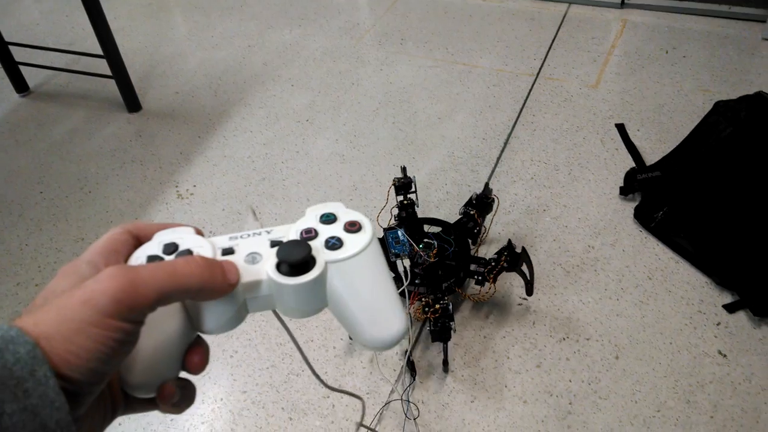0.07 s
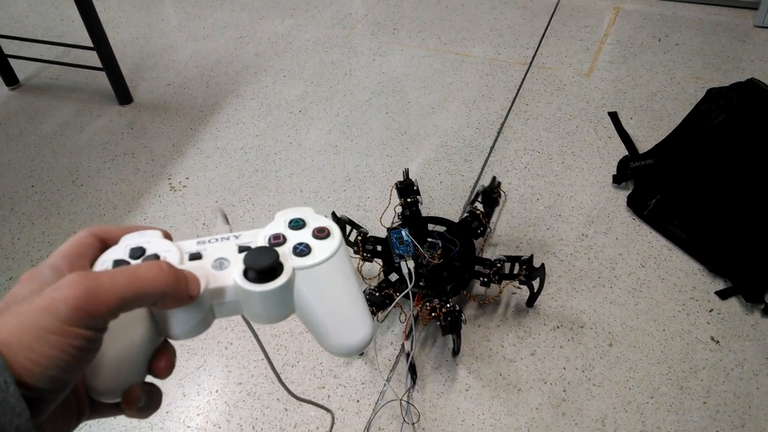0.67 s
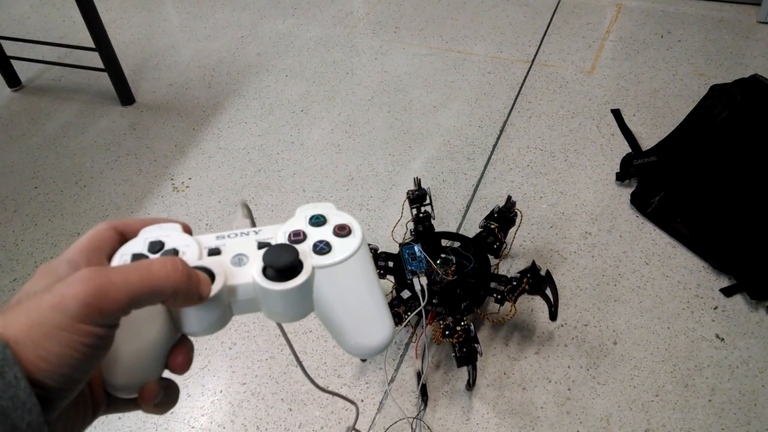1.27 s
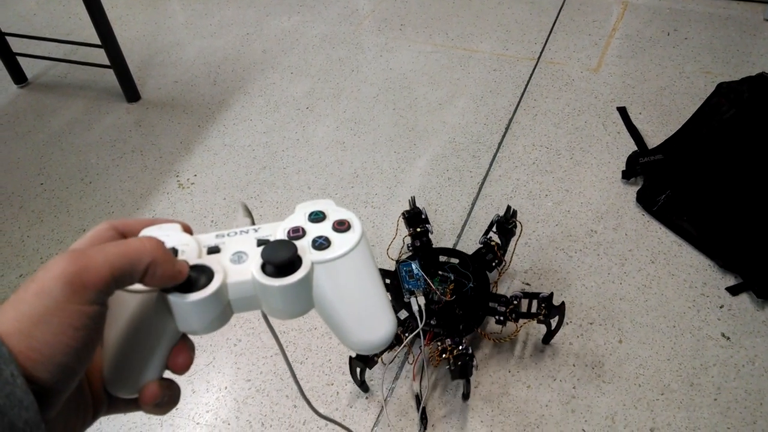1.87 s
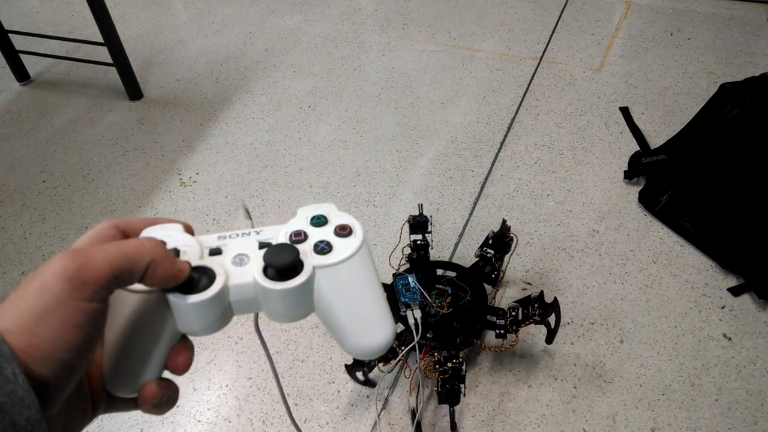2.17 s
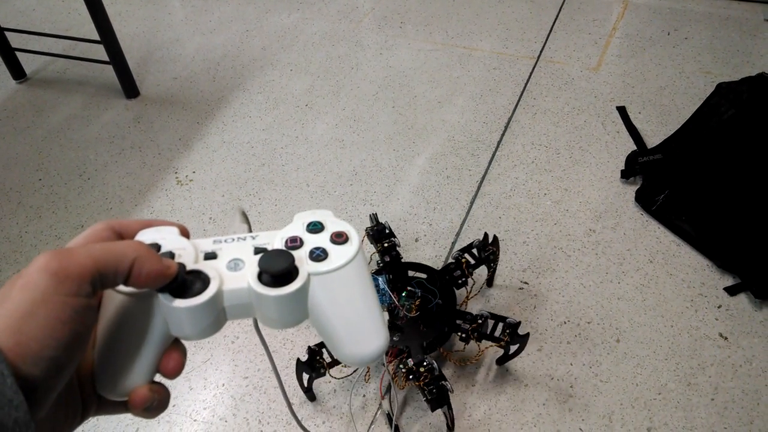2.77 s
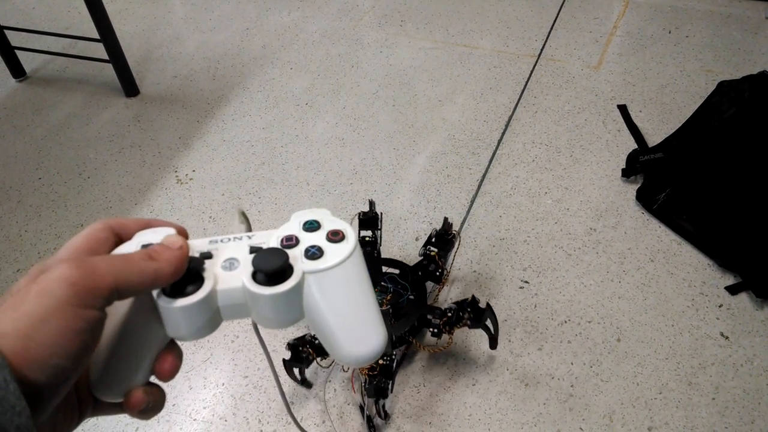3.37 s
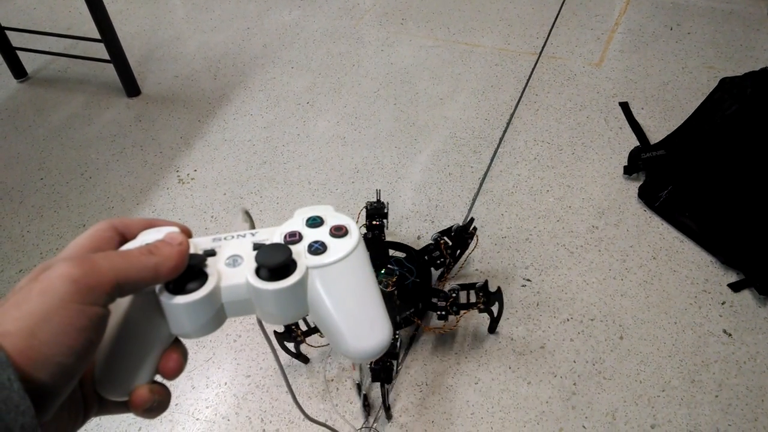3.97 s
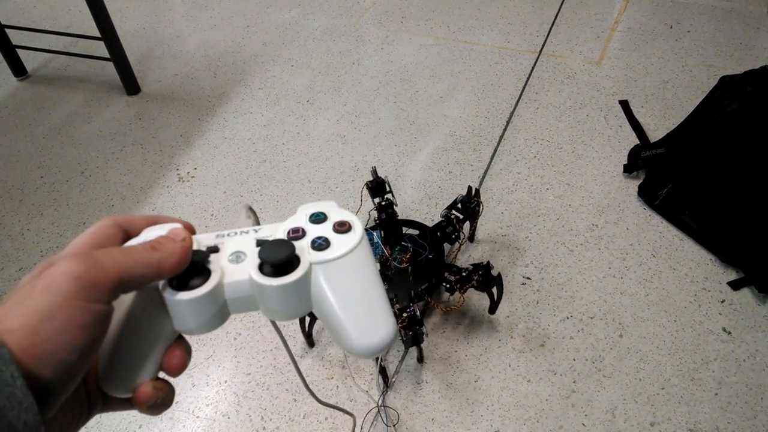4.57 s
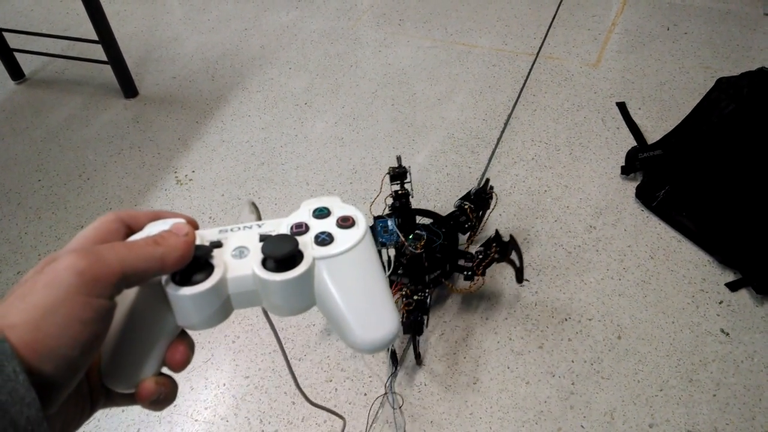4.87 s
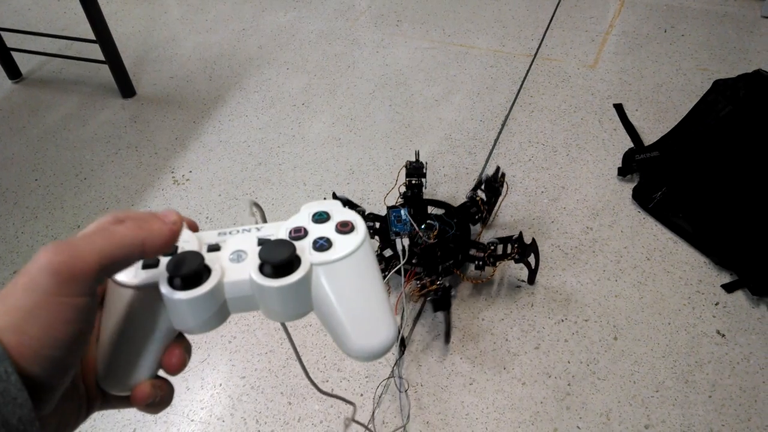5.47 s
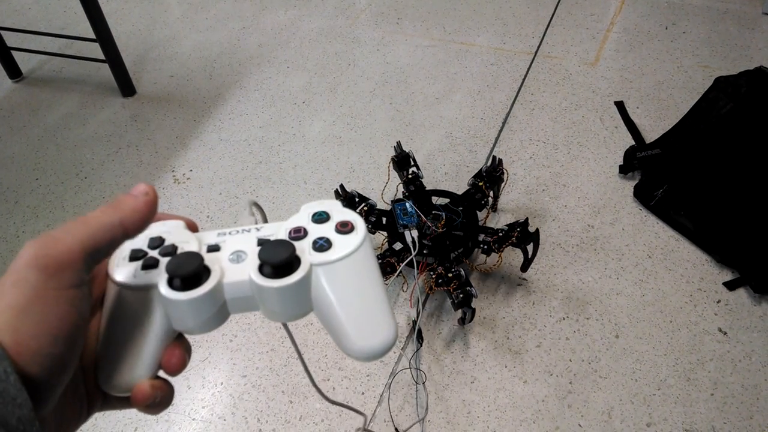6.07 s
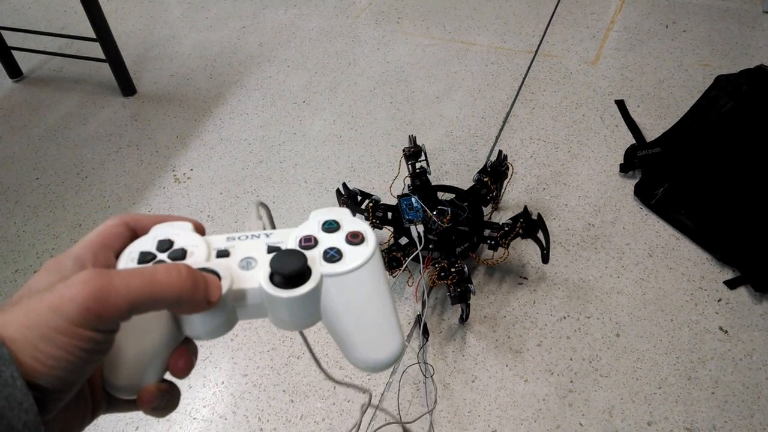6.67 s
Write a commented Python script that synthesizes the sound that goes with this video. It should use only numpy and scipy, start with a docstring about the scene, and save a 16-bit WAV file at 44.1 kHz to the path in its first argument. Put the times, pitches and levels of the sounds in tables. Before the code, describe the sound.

Ventilation hums steadily in a large room while a small walking robot moves in front of the microphone, slightly to the right. Its servos buzz and whine in repeating surges, and five sharp footfalls clack on the hard floor, each shaking and rattling its body, with lighter steps in between. The steps then stop, leaving faint high motor tones and a single close plastic click from a game controller.

```python
"""Geared servos whirr and whine as a small six-legged robot walks a hard floor, one stride every 1.2 s.
Its legs fizz as they swing free; feet snap down and the frame thuds and rattles. Stalled motors sing
as they hold a load, and in a pause a gamepad clicks once, close by. The robot is in front and to the
right of a closely spaced microphone pair, in a large room where ventilation hums throughout."""
import sys
import numpy as np
from scipy import signal
from scipy.fft import rfft, irfft
from scipy.io import wavfile
from scipy.ndimage import uniform_filter1d, map_coordinates

SR = 44100
rng = np.random.default_rng(int(sys.argv[2]) if len(sys.argv) > 2 else 0)


def master_out(mix):
    """Clip the mix to full scale and print it as 16-bit PCM to the path in sys.argv[1]."""
    frames = np.transpose(np.atleast_2d(mix))
    ceiling = np.clip(frames, -1, 1)
    pcm = np.round(ceiling * 32767).astype(np.int16)
    wavfile.write(sys.argv[1], SR, pcm)


N = 295911
TIME = np.arange(N) / SR


# Servo cases ringing under load, in front of the microphones: pitch_hz, width_hz, level_db
LOADED_CASE_MODES = [(1784, 160, -2.5), (3324, 1200, 0), (4360, 340, 3.5), (4800, 230, 2.5),
                     (6210, 480, -3), (8770, 500, -4.5), (11600, 4600, -18), (14900, 2900, -12.5)]
# The same cases with the gears running free: pitch_hz, width_hz, level_db
FREE_CASE_MODES = [(2000, 410, -2), (3470, 2300, 0.5), (6070, 1300, 3.5), (9030, 410, 8), (10400, 2200, -4),
                   (12250, 750, 1), (15200, 900, -8)]

def servos(load, pushing):
    """Gears whirr under load and fizz when they run free; backlash ticks through both."""
    whirr = gear_train(LOADED_CASE_MODES, mesh_hz=559, chatter_db=5.5, buzz_db=2, flutter_db=1.3)
    fizz = gear_train(FREE_CASE_MODES, mesh_hz=951, chatter_db=10, buzz_db=2.5, flutter_db=2)
    whirr = whirr + from_db(-9) * backlash()
    fizz = fizz + from_db(-10.5) * backlash()
    return load * whirr + from_db(4) * swinging_legs(fizz, pushing)


def gear_train(case, mesh_hz, chatter_db, buzz_db, flutter_db, servo_count=3):
    """Teeth strike the case in a buzz that glides with each servo's speed; their play chatters."""
    buzz, chatter = 0, 0
    for _ in range(servo_count):
        speed = from_db(1.3 * drift(2.5))
        teeth = np.cumsum(mesh_hz * speed * (1 + .006 * drift(150))) / SR
        buzz = buzz + np.diff(teeth % 1, prepend=0) * from_db(3 * drift(6))
        pulsing = from_db(chatter_db * np.sin(np.pi * teeth / 2))  # one cycle every four teeth
        chatter = chatter + grains(per_s=4700, spread_db=0.5) * pulsing
    sound = rms_one(resonate(chatter, case)) + from_db(buzz_db) * rms_one(resonate(buzz, case))
    return evened(sound, samples=SR // 16) * from_db(flutter_db * drift(47))


# Servo cases ticking as the teeth jump their play: pitch_hz, width_hz, level_db
BACKLASH_MODES = [(5540, 540, -0.5), (6850, 1400, -3), (8200, 610, 2), (11400, 1500, -10)]

def backlash():
    """Loose teeth tick at random, in small clusters."""
    ticks = grains(per_s=170, spread_db=-1.5) * from_db(2 * drift(24))
    return evened(resonate(ticks, BACKLASH_MODES), samples=SR // 4)


# Legs swung through the air between footfalls and set down softly, one after another:
# first_foot_s, swing_s, last_foot_delay_s, fizz_db, speed_ratio, tap_db, thud_db
SWINGS = [(0.523, 0.34, 0.0037, -39.5, 1.03, -20, -24), (1.69, 0.36, 0.024, -38.5, 1.02, -23.5, -27),
          (2.894, 0.35, 0.026, -39.5, 0.97, -22, -30), (4.079, 0.42, 0.042, -40.5, 1.0, -20, -31),
          (5.242, 0.28, 0.0077, -39.5, 1, -40, -29)]

def swinging_legs(fizz, pushing, peak_share=.76, brake_s=0.053, glide=.06):
    """A free leg gathers speed and brakes as the last foot lands; its fizz swells and climbs with it."""
    level = from_db(-12) * pushing  # a little fizz in each push too
    pitch = 1 - glide + .011 * drift(9)
    for foot_s, swing_s, delay_s, fizz_db, speed_ratio, *_ in SWINGS:
        progress = np.maximum(TIME - foot_s + swing_s, 0) / (swing_s + delay_s)
        braking = np.clip(1 - (TIME - foot_s - delay_s) / brake_s, 0, 1)
        speed = np.abs(np.sin(np.pi / 2 * np.minimum(progress / peak_share, 2))) * braking
        level = level + from_db(fizz_db) * speed ** 1.2
        pitch = pitch + (glide + speed_ratio - 1) * speed
    return level * map_coordinates(fizz, [np.cumsum(pitch)], order=3, mode="mirror")


# Joint moves that whine clearly at the microphones, each gliding in an arc:
# start_s, length_s, first_hz, middle_hz, last_hz, level_db
JOINT_MOVES = [(0.02, 0.19, 4220, 4070, 3920, -45), (0.17, 0.21, 3970, 3640, 3370, -45),
               (0.194, 0.13, 4200, 4280, 4130, -47), (0.66, 0.11, 3590, 3770, 3900, -42),
               (0.8, 0.12, 4250, 4240, 4190, -48), (0.831, 0.11, 4050, 3980, 3760, -43),
               (1.14, 0.17, 4270, 4330, 4080, -44.5), (1.461, 0.165, 3800, 3640, 3600, -39),
               (1.603, .1, 4670, 4600, 4420, -47), (1.742, 0.21, 4600, 4790, 4900, -40),
               (1.78, 0.26, 4090, 4250, 4100, -47), (2.03, 0.094, 3600, 3500, 3460, -47),
               (2.357, 0.13, 4330, 4350, 4400, -45), (2.726, 0.12, 4220, 3900, 3580, -36.5),
               (2.987, 0.16, 4600, 4840, 4760, -38.5), (3.079, 0.2, 4080, 3620, 3340, -44),
               (3.15, 0.11, 4310, 3980, 3680, -44), (3.21, 0.18, 4470, 4320, 4300, -46),
               (3.568, 0.12, 4780, 4580, 4520, -41), (4.189, 0.16, 4020, 3860, 3840, -41),
               (4.202, 0.12, 4770, 4900, 4630, -38), (4.327, 0.13, 3850, 4160, 4060, -37),
               (4.374, 0.12, 3900, 3800, 3660, -44), (4.736, 0.12, 3720, 3630, 3590, -44),
               (5.025, 0.094, 3740, 4050, 4230, -38), (5.446, 0.1, 4380, 4360, 4160, -49),
               (5.568, 0.076, 4280, 4170, 4120, -46), (6.566, 0.11, 3630, 3480, 3500, -47)]

def gear_whines(roughness, waver, flutter_db, octave_db):
    """The gear mesh glides with the joint's speed, wavers with its load and is roughened by backlash."""
    out = np.zeros(N)
    unsteady = roughness * drift(175) + waver * drift(17.6)
    flutter = from_db(flutter_db * drift(32))
    for start_s, length_s, first_hz, middle_hz, last_hz, level_db in JOINT_MOVES:
        progress = np.linspace(0, 1, int(length_s * SR))
        own = rng.integers(N - SR) + np.arange(len(progress))  # each joint wavers in its own way
        arc_hz = np.polyval(np.polyfit([0, .5, 1], [first_hz, middle_hz, last_hz], 2), progress)
        phase = 2 * np.pi * np.cumsum(arc_hz * (1 + unsteady[own])) / SR
        mesh = np.sin(phase) + from_db(octave_db) * np.sin(2 * phase)
        envelope = np.sqrt(np.abs(np.sin(np.pi * progress)))
        add(out, start_s, from_db(level_db) * envelope * flutter[own] * mesh)
    return out


# Planted legs pushing the body across the floor: start_s, end_s, rise_s, gear_db, shudder_db
PUSHES = [(-0.1, 0.06, .03, -39, -39), (0.61, 0.914, .03, -44, -44.5), (1.79, 1.95, 0.026, -40, -52),
          (2.95, 3.313, .03, -41.5, -66), (4.162, 4.373, .03, -43, -67), (4.73, 4.827, .03, -41, -49),
          (5.308, 5.56, .03, -52, -58), (6.59, 6.58, 0.23, -45.5, -64)]

def effort():
    """Strength of the gear load, the frame's shudder and the pushes alone; causes add in power."""
    walking = 1 - swell(6.0, 6.46, attack_s=0.06, release_s=0.06)  # zero during the pause
    gears, frame = [from_db(-43.5) * walking], [from_db(-52) * walking]  # small moves keep both astir
    for at_s, *_ in FOOTFALLS:  # the gears take up the weight
        gears.append(from_db(-35.5) * swell(at_s, at_s + 0.1, attack_s=.045, release_s=0.26))
    for steps, tremble_db in (FOOTFALLS, -34.5), (SWINGS, -43.5):
        for at_s, *_ in steps:
            tremble = (TIME > at_s) * np.exp(-np.abs(TIME - at_s) / 0.24)
            frame.append(from_db(tremble_db) * walking * tremble)
    pushing = 0
    for start_s, end_s, rise_s, gear_db, shudder_db in PUSHES:
        push = swell(start_s, end_s, rise_s, release_s=0.097)
        pushing = pushing + from_db(gear_db) * push
        frame.append(from_db(shudder_db) * push)
    return np.linalg.norm(gears + [pushing], axis=0), np.linalg.norm(frame, axis=0), pushing


# Feet on the hard floor, once a stride; the crack is relative to the ring: time_s, snap_db, ring_hz,
# crack_db, toe_db, rebound_delay_s, rebound_db, settle_delay_s, tap_db, thud_db, knock_db, rattle_db
FOOTFALLS = [(0.9675, -9, 3780, -5, -21, 0.012, -17, 0.059, -21, -19.5, -45, -21),
             (2.1705, -11, 4040, -3.5, -29, 0.0085, -10, 0.067, -23.5, -24, -50, -26),
             (3.3716, -9.5, 4080, -0.5, -20, 0.023, -30, 0.0655, -17, -19, -34, -25),
             (4.5698, -11.5, 3810, 1, -18, .032, -23, 0.049, -26, -38, -68, -26.5),
             (5.7227, -8.5, 3460, -0.5, -19, 0.016, -24, 0.053, -27, -20, -55, -23)]
# Joints clacking in their play, most often just after a footfall: time_s, level_db, crack_db
JOINT_CLACKS = [(.431, -41, 17), (.875, -32, 7), (1.0124, -21, 9), (1.037, -24, 7), (1.279, -32.5, 11),
                (1.664, -26, 9), (2.2176, -26, 10), (2.24, -25, 6), (2.933, -25.5, 8), (3.224, -32.5, 13),
                (3.3349, -29.5, 10), (3.4005, -27, 8), (3.418, -27, 15), (3.443, -28, 12), (3.469, -28, 12),
                (3.512, -26, 8), (4.067, -25, 3), (4.38, -25.5, -12), (4.546, -35.5, 15.5), (4.587, -27, 6),
                (4.635, -29, 10), (4.896, -21.5, 1.5), (5.779, -20.5, 1), (5.801, -33, 7), (5.862, -35, 0),
                (5.9264, -35, 8)]

def gait(leg_hz=3960, settle_crack_db=10, soft_crack_db=-1.5, light_knock_db=-63):
    """Feet touch, snap down, rebound and take the weight: contacts for the legs, blows for the frame."""
    contacts = [(at_s, level_db, leg_hz, crack_db) for at_s, level_db, crack_db in JOINT_CLACKS]
    blows = []  # time_s, thud_db, knock_db, rattle_db
    for (at_s, snap_db, ring_hz, crack_db, toe_db, rebound_s, rebound_db,
         settle_s, tap_db, thud_db, knock_db, rattle_db) in FOOTFALLS:
        contacts += [(at_s - .004, toe_db, ring_hz, crack_db),
                     (at_s, snap_db, ring_hz, crack_db),
                     (at_s + rebound_s, rebound_db, ring_hz, crack_db),
                     (at_s + settle_s, tap_db, ring_hz, settle_crack_db)]
        blows += [(at_s + 0.0188, -34, light_knock_db, -28.5),  # the frame feels the snap a little later
                  (at_s + settle_s - 0.0026, thud_db, knock_db, rattle_db)]  # it gives before the tap
    for at_s, _, delay_s, *_, tap_db, thud_db in SWINGS:
        contacts += [(at_s, tap_db - 5, leg_hz, soft_crack_db),  # the first foot touches more lightly
                     (at_s + delay_s, tap_db, leg_hz, soft_crack_db)]
        blows.append((at_s, thud_db, light_knock_db, -27))
    return contacts, blows


# Loose parts of a leg, buzzing and rattling just above the floor: pitch_hz, width_hz, level_db
LEG_MODES = [(2300, 800, 2.5), (3060, 2000, -1.5), (4730, 310, 4.5), (6480, 150, -4.5), (9000, 320, -4),
             (11000, 350, -4.5)]

def leg_taps(contacts, ring_s, crack_s, crack_band_hz, buzz_db, buzz_s):
    """A contact rings the leg for a few cycles, with a bright crack and a short buzz of loose parts."""
    out, t = np.zeros(N), TIME[:SR // 8]
    for at_s, level_db, ring_hz, crack_db in contacts:
        phase = 2 * np.pi * ring_hz * (1 + .02 * rng.standard_normal()) * t
        two_modes = np.sin(phase) - from_db(-15.5) * np.sin(1.33 * phase)
        ring = t / ring_s * np.exp(1 - t / ring_s) * two_modes
        crack = rms_one(band(rng.standard_normal(len(t)), *crack_band_hz, order=3))
        crack *= 0.44 * np.exp(-t / crack_s)
        buzz = rms_one(resonate(rng.standard_normal(len(t)), LEG_MODES[1:]))
        buzz *= np.exp(-t / buzz_s) * (1 - np.exp(-t / ring_s))
        add(out, at_s, from_db(level_db) * (ring + from_db(crack_db) * crack + from_db(buzz_db) * buzz))
    return out


# The walking frame's dull thud: pitch_hz, width_hz, level_db
FRAME_THUD_MODES = [(171, 78, -1.5), (259, 108, 2), (372, 47, 3.5), (486, 87, -15.5)]
# The knock of the deck it carries: pitch_hz, width_hz, level_db
DECK_MODES = [(596, 135, 2), (755, 190, -2.5), (990, 140, -6), (1740, 280, -24)]

def landings(blows, shudder, thud_s, knock_s, rattle_s):
    """The frame thuds and shudders, the deck knocks and the play in the joints rattles out."""
    powers, t = np.zeros((3, N)), TIME[:SR]
    attack = 1 - np.exp(-t / 0.0002)
    for at_s, *levels_db in blows:
        for power, level_db, decay_s in zip(powers, levels_db, (thud_s, knock_s, rattle_s)):
            add(power, at_s, (from_db(level_db) * np.exp(-t / decay_s) * attack) ** 2)
    thud, knock, rattle = np.sqrt(powers)
    frame = rms_one(band(resonate(grains(per_s=2500, spread_db=1), FRAME_THUD_MODES), 92, 1600))
    deck = rms_one(resonate(grains(per_s=2500, spread_db=2), DECK_MODES))
    joints = rms_one(resonate(grains(per_s=3100, spread_db=-7.5), LEG_MODES))
    shaking = np.hypot(from_db(-4.5) * thud, from_db(-2.5) * shudder)
    return shaking * frame + knock * deck + rattle * joints


# The frame's long, low ring after a landing: pitch_hz, level_db, t60_s
FRAME_RING_MODES = [(149.2, -12.5, 0.84), (176.8, -13, 0.94), (245, -13, 0.44), (260, -14.5, 0.32),
                    (302, -24, 0.22), (343.7, -34.5, 0.49), (418, -21.5, 0.12)]

def frame_boom(blows, uneven_db, hard_thud_db=-31):
    """Each landing rings the frame's low modes; soft ones reach mainly the lowest."""
    out, t = np.zeros(N), TIME[:SR]
    pitch_hz, mode_db, t60_s = np.transpose(FRAME_RING_MODES)
    rings = np.sin(2 * np.pi * np.outer(pitch_hz, t)) * from_db(-60 * np.outer(1 / t60_s, t))
    octaves = np.log2(pitch_hz / np.median(pitch_hz))
    for at_s, thud_db, *_ in blows:
        tilt_db = 0.93 * (thud_db - hard_thud_db) * octaves
        scatter_db = uneven_db * rng.standard_normal(len(pitch_hz))
        add(out, at_s, from_db(thud_db + mode_db + tilt_db + scatter_db) @ rings)
    return band(out, 110, 3000, order=3)


# Thin notes from servos holding against a load: start_s, end_s, pitch_hz, level_db
HOLDS = [(0, 0.278, 1390, -55), (0, .35, 3470, -58), (0.4, .87, 3080, -56), (0.325, 0.682, 338, -46),
         (.58, .84, 4260, -54), (1.12, 1.495, 3504, -48), (1.198, 1.493, 1390, -52),
         (1.543, 2.048, 1390, -57), (2.509, 4.5, 1388, -61), (4.654, 5.746, 1226, -58.5),
         (4.787, 5.798, 1644, -59), (1.797, 1.99, 2840, -55), (5.29, 5.72, 2570, -47),
         (5.3, 5.7, 3670, -56), (6.002, 6.503, 2310, -60), (5.801, 6.71, 1580, -58.5),
         (5.782, 6.29, 1915, -59.5), (6.03, 6.48, 4300, -56.5), (6.05, 6.46, 3535, -54.5),
         (6.14, 6.42, 3140, -62)]

def holding_servos(wander, flutter_db):
    """Stalled motors sing at the pulse rates of their drivers."""
    out = np.zeros(N)
    for start_s, end_s, pitch_hz, level_db in HOLDS:
        note = tone(pitch_hz, wander, flutter_db, rate_hz=42)[:int((end_s - start_s) * SR)]
        add(out, start_s, from_db(level_db) * note * signal.windows.tukey(len(note), .3))
    return out


# The gamepad's shell, close to the microphones: pitch_hz, width_hz, level_db
GAMEPAD_MODES = [(1050, 180, 14.5), (1480, 310, -18), (2200, 370, -10), (3570, 1100, 3.5), (4560, 420, -2),
                 (6300, 410, -5.5)]

def gamepad(at_s, level_db):
    """A thumb control clicks in its hollow plastic shell."""
    out = np.zeros(N)
    click = resonate(signal.unit_impulse(SR // 10), GAMEPAD_MODES)
    add(out, at_s, from_db(level_db) * click / np.abs(click).max())
    return out


# Spectrum of the ventilation's air, all around the microphones: frequency_hz, level_db
AIR_SPECTRUM = [(15, -11), (25, -5), (64, -8.5), (293, -1.5), (516, -3), (1160, -8), (1480, -12.5),
                (1610, -14), (2610, -25), (3620, -12.5), (5280, -26.5), (14800, -33.5), (16000, -31)]
# Faint fan tones in the room: pitch_hz, level_db
FAN_TONES = [(146, -62), (179, -65.5), (264, -68), (528, -64.5), (1045, -62)]
# A low handling rumble at the microphones, slowly ebbing: time_s, level_db
HANDLING_LEVELS = [(0, -33), (.6, -37.5), (1.3, -38), (2.7, -41.5), (3.3, -42), (4.2, -46), (6.3, -52),
                   (6.71, -49)]

def background(air_db, rumble_db):
    """Diffuse ventilation air; handling rumble, fan tones and drifting hums lean to the left."""
    hz = np.fft.rfftfreq(N, 1 / SR) + 1
    points_hz, levels_db = np.transpose(AIR_SPECTRUM)
    spectrum = from_db(np.interp(np.log(hz), np.log(points_hz), levels_db))
    air = irfft(rfft(rng.standard_normal((2, N))) * spectrum, N)
    air = rms_one(close_pair(air, alike_hz=2670))
    rumble = rms_one(band(rng.standard_normal(N) + 1.1 * rng.standard_normal((2, N)), 65, 182, order=3))
    rumble *= from_db(np.interp(TIME, *np.transpose(HANDLING_LEVELS)) + rumble_db)
    fans = sum(from_db(db) * tone(pitch_hz, wander=0.00838, flutter_db=2, rate_hz=5.45)
               for pitch_hz, db in FAN_TONES)
    hums = close_pair([room_hums(wander=.016, flutter_db=2.5) for _ in range(2)], alike_hz=200)
    return from_db(air_db) * air + (rumble + fans + hums) * from_db([[2.2], [-2.2]])


# Low hums that come and go in the room: start_s, end_s, first_hz, last_hz, level_db
ROOM_HUMS = [(-.1, 0.46, 132, 125.4, -46), (.35, 1.305, 130, 123.5, -50.5), (-.1, 1.82, 91.2, 87, -55.5),
             (-.1, 0.91, 63, 66, -53.5), (.4, 1.4, 103, 101, -67), (1.3, 1.6, 120, 119.5, -59),
             (1.6, 2.9, 97, 92.4, -56.5), (3.0, 3.83, 90.3, 90.4, -49.5), (3.799, 5.3, 86.7, 85.7, -55),
             (3.85, 5.75, 120, 120.8, -56.5), (4.85, 6.4, 65, 67.2, -55), (5.849, 6.8, 66, 64.2, -54.5)]

def room_hums(wander, flutter_db, fade_s=0.063):
    """Low hums swell, drift in pitch and fade."""
    out = np.zeros(N)
    for start_s, end_s, first_hz, last_hz, level_db in ROOM_HUMS:
        pitch_hz = np.interp(TIME, [0, end_s - start_s], [first_hz, last_hz])
        note = tone(pitch_hz, wander, flutter_db, rate_hz=7.6)
        fades = swell(start_s + fade_s, end_s - fade_s, fade_s, fade_s)
        out += from_db(level_db) * fades * np.roll(note, max(round(start_s * SR), 0))
    return out


def room(x, low_t60_s, high_t60_s, wet_db, bands):
    """Reverberation from all sides: each band's energy builds up and dies away, the treble first."""
    out, white = np.zeros((2, N)), rng.standard_normal((2, 2, N))
    edges_hz = np.geomspace(120, 17000, bands + 1)
    for k, (low_hz, high_hz) in enumerate(zip(edges_hz, edges_hz[1:])):
        t60_s = np.interp(low_hz, [3000, 12000], [low_t60_s, high_t60_s])
        retained = from_db(-120 / (t60_s * SR))
        energy = signal.lfilter([1 - retained], [1, -retained], band(x + 1e-18, low_hz, high_hz) ** 2)
        out += np.sqrt(energy) * rms_one(band(white[k % 2], low_hz, high_hz))
    return from_db(wet_db) * close_pair(out, alike_hz=1590)


# The left microphone's phase for sound from the robot, lagging in the treble: frequency_hz, lead_rad
LEFT_PHASE = [(0, 1), (1640, -0.22), (2410, -3), (2840, -3), (3530, -5.5), (4130, -6.5), (6550, -12),
              (8350, -16), (9040, -17.5), (12000, -24.4), (12700, -24), (14900, -32), (15400, -29),
              (16200, -26.2)]

def from_the_right(x):
    """The left microphone hears the robot's treble a little later than the right."""
    lead_rad = np.interp(np.fft.rfftfreq(N, 1 / SR), *np.transpose(LEFT_PHASE))
    return np.array([irfft(rfft(x) * np.exp(1j * lead_rad), N), x])


def shaded(pair, shadow_hz=7640):
    """The left microphone loses upper treble; the right gains a little."""
    hz = np.fft.rfftfreq(N, 1 / SR)
    treble = hz ** 4 / (hz ** 4 + shadow_hz ** 4)
    gain_db = np.outer([-8.5, 3], treble) + [[-.6], [.6]]
    return irfft(rfft(pair) * from_db(gain_db), N)


def close_pair(pair, alike_hz):
    """Long waves reach both microphones much alike."""
    hz = np.fft.rfftfreq(N, 1 / SR)
    alike = .62 / (1 + (hz / alike_hz) ** 4)
    mid, side = rfft(pair)
    return irfft(np.sqrt(1 + alike) * mid + np.sqrt(1 - alike) * side * [[1], [-1]], N) / np.sqrt(2)


def resonate(x, modes):
    """Parallel resonances of alternating sign."""
    out = 0
    for k, (pitch_hz, width_hz, level_db) in enumerate(modes):
        radius = np.exp(-np.pi * width_hz / SR)
        zeros = np.array([1, 0, -1]) * (1 - radius ** 2) / 2
        poles = [1, -2 * radius * np.cos(2 * np.pi * pitch_hz / SR), radius ** 2]
        out = out + (-1) ** k * from_db(level_db) * signal.lfilter(zeros, poles, x + 1e-18)
    return out


def grains(per_s, spread_db):
    """Random tiny impacts of uneven size."""
    sizes = from_db(spread_db * np.minimum(rng.exponential(1, N), 4))
    return (rng.random(N) < per_s / SR) * sizes * rng.choice([-1, 1], N)


def tone(pitch_hz, wander, flutter_db, rate_hz):
    """A sine of rms about 1 whose pitch and level waver."""
    phase = 2 * np.pi * np.cumsum(pitch_hz * (1 + wander * drift(rate_hz))) / SR
    return np.sqrt(2) * np.sin(phase) * from_db(flutter_db * drift(rate_hz))


def drift(rate_hz):
    """A smooth random curve of rms about 1."""
    hz = np.fft.rfftfreq(N // 40, 40 / SR)
    slow = irfft(rfft(rng.standard_normal(N // 40)) / (1 + (hz / rate_hz) ** 2))
    return np.interp(np.arange(N) / 40, np.arange(len(slow)), rms_one(slow))


def swell(start_s, end_s, attack_s, release_s):
    """Rises before the start, holds, and falls after the end."""
    return np.clip(1 + (TIME - start_s) / attack_s, 0, 1) * np.clip(1 - (TIME - end_s) / release_s, 0, 1)


def evened(x, samples):
    """Holds the rms at 1 over spans of this many samples."""
    return x / np.sqrt(uniform_filter1d(x * x, samples) + 1e-12)


def band(x, low_hz, high_hz, order=2):
    return signal.sosfilt(signal.butter(order, [low_hz, high_hz], "band", fs=SR, output="sos"), x)


def add(out, at_s, sound):
    at = max(round(at_s * SR), 0)
    out[at:at + len(sound)] += sound[:N - at]


def from_db(db):
    return 10 ** (np.asarray(db) / 20)


def rms_one(x):
    return x / np.sqrt(np.mean(x ** 2) + 1e-20)


def scene():
    """Robot in front and to the right, gamepad close by, room all around."""
    load, shudder, pushing = effort()
    contacts, blows = gait()
    gears = servos(load, pushing)
    taps = leg_taps(contacts, ring_s=.00058, crack_s=0.0018, crack_band_hz=(5470, 11600),
                    buzz_db=-7.5, buzz_s=0.0031)
    thuds = landings(blows, shudder, thud_s=0.008, knock_s=0.073, rattle_s=0.017)
    robot = gears + taps + thuds
    whines = from_db(0.3) * gear_whines(roughness=.025, waver=.01, flutter_db=3.5, octave_db=-13.5)
    singing = from_db(1) * holding_servos(wander=0.0012, flutter_db=2.6)
    click = gamepad(at_s=6.39, level_db=-20)
    reflected = room(robot + 0.5 * click, low_t60_s=0.34, high_t60_s=0.12, wet_db=-4, bands=18)
    boom = frame_boom(blows, uneven_db=2.5)
    direct = from_db(-2.5) * from_the_right(robot + whines + singing + boom)
    return shaded(direct + reflected) + click + background(air_db=-43, rumble_db=-9.5)


def record(dry):
    """A narrow band near 2.7 kHz is cut from the centre; a 2.5 kHz ring sounds in opposite phase
    left and right. The top treble is cut."""
    mid = dry.mean(axis=0)
    notched = signal.sosfilt(signal.butter(2, [2490, 2890], "bandstop", fs=SR, output="sos"), mid)
    side_ring = resonate(mid, [(2490, 104, 11.6)]) * [[1], [-1]]
    treble_cut = signal.ellip(10, .2, 80, 15650, fs=SR, output="sos")
    return signal.sosfilt(treble_cut, dry - mid + notched + side_ring)


dry = scene()
out = record(dry)
master_out(out)
```